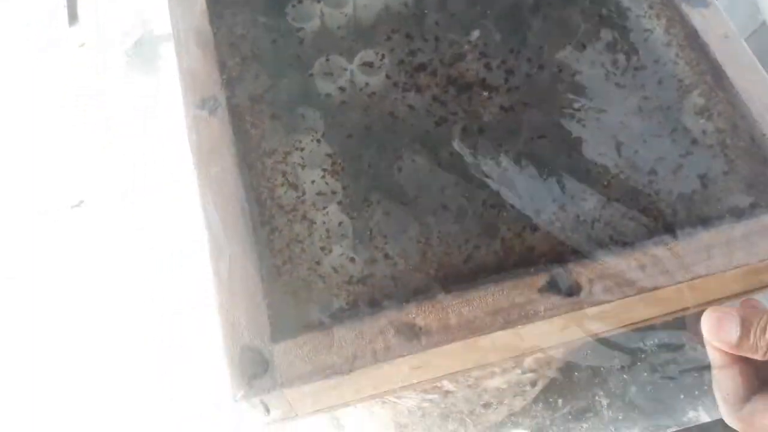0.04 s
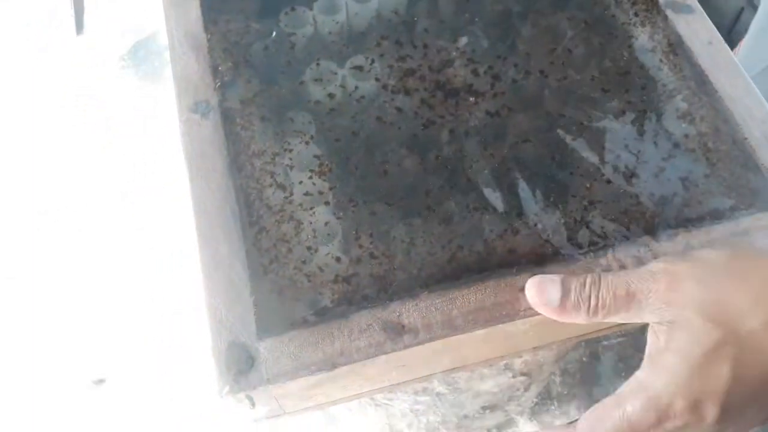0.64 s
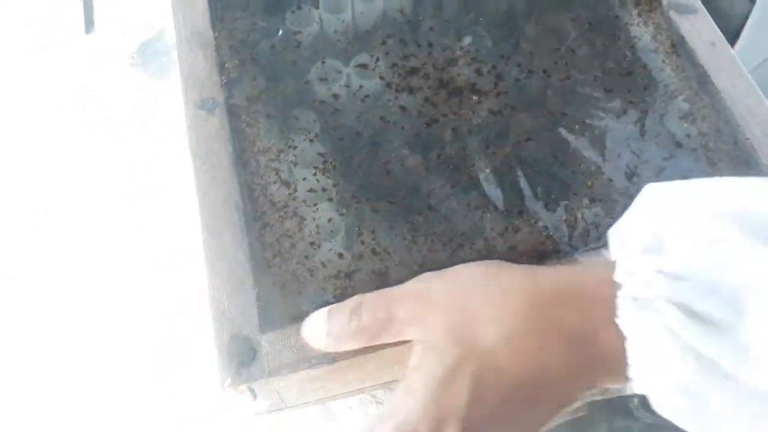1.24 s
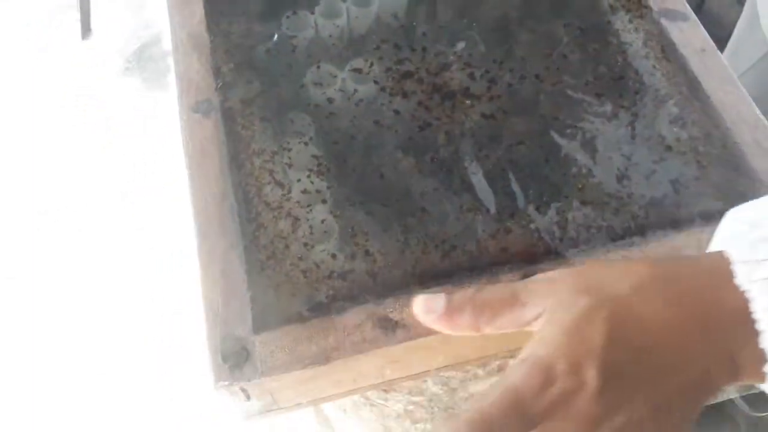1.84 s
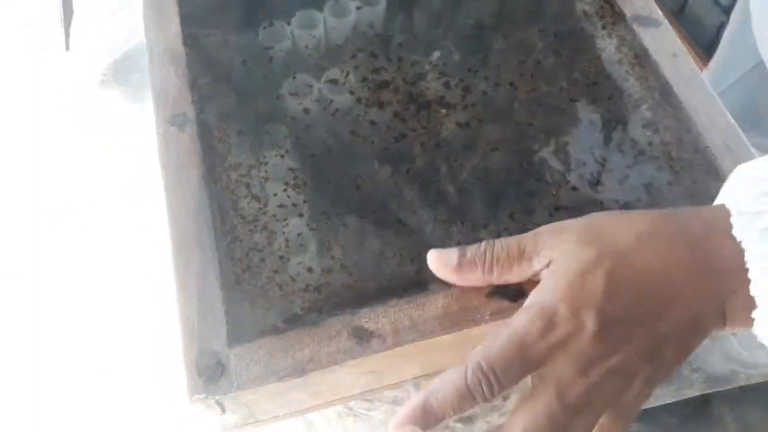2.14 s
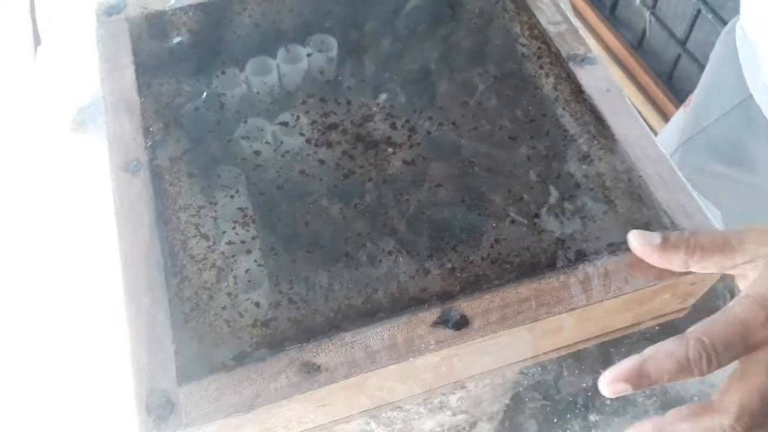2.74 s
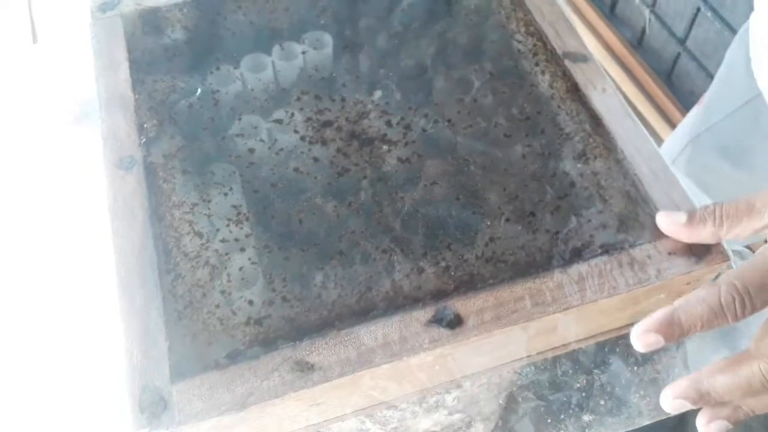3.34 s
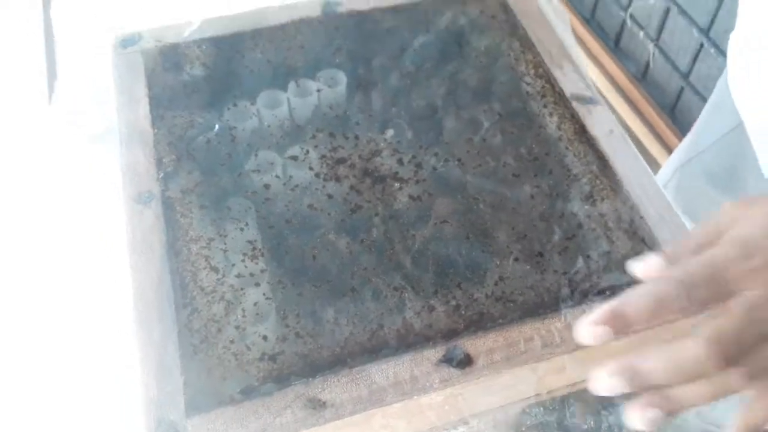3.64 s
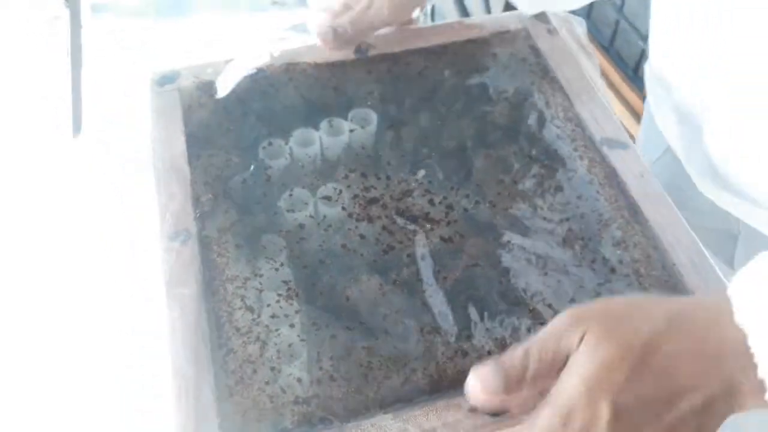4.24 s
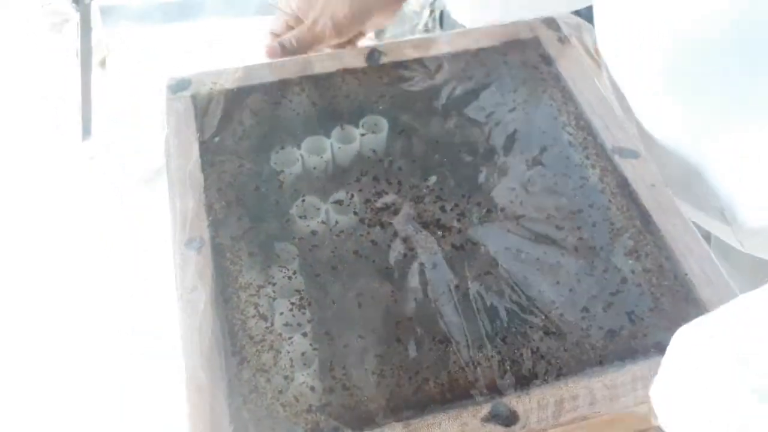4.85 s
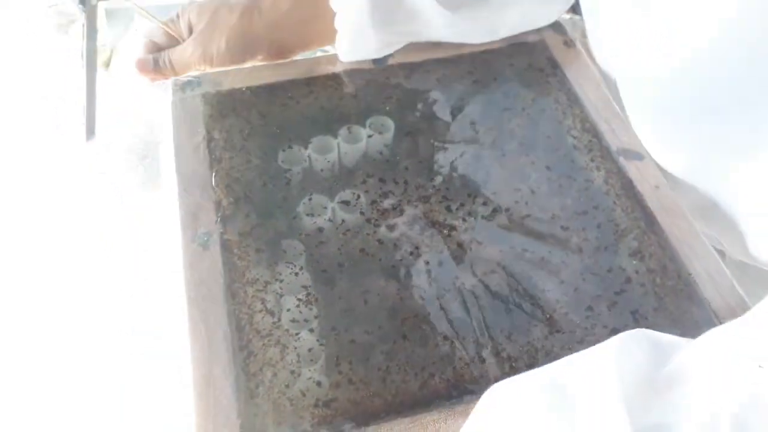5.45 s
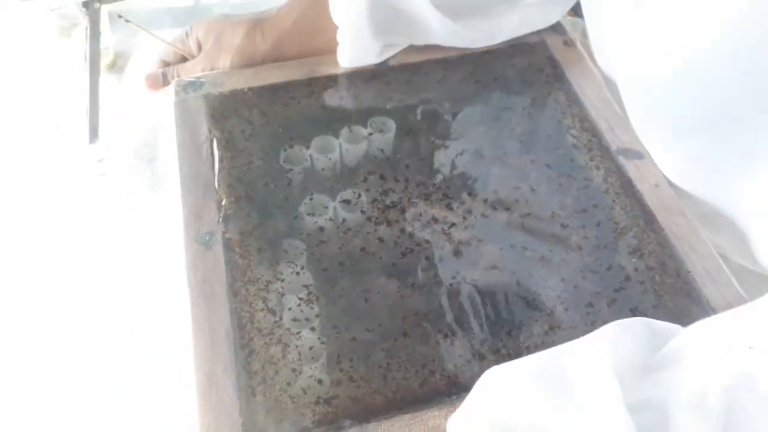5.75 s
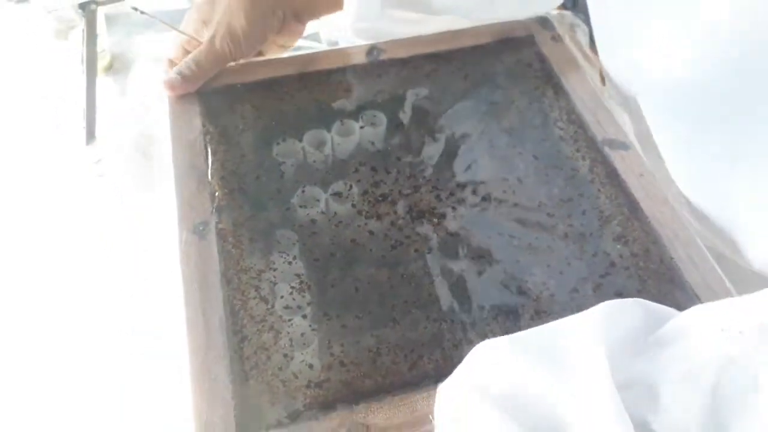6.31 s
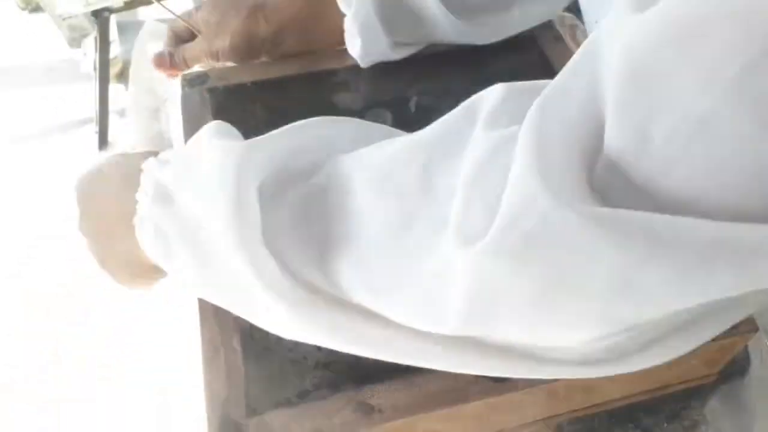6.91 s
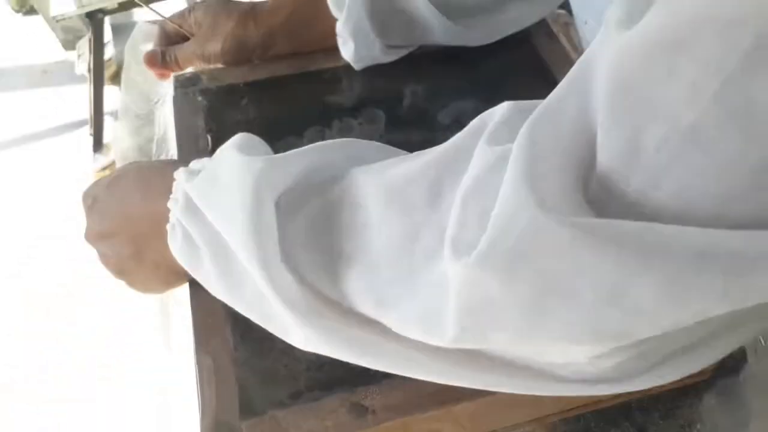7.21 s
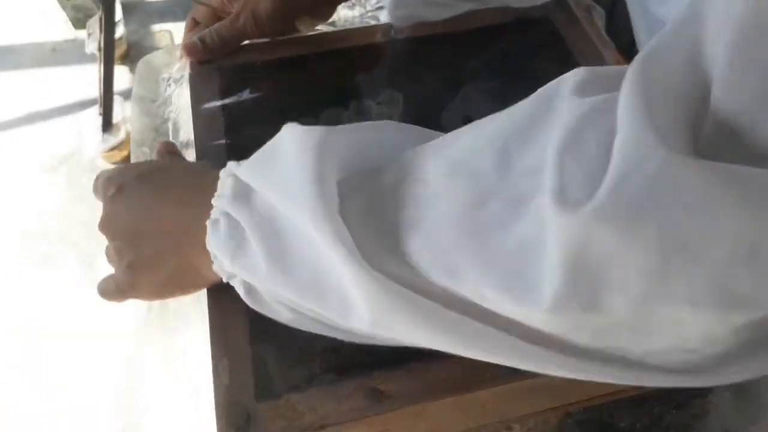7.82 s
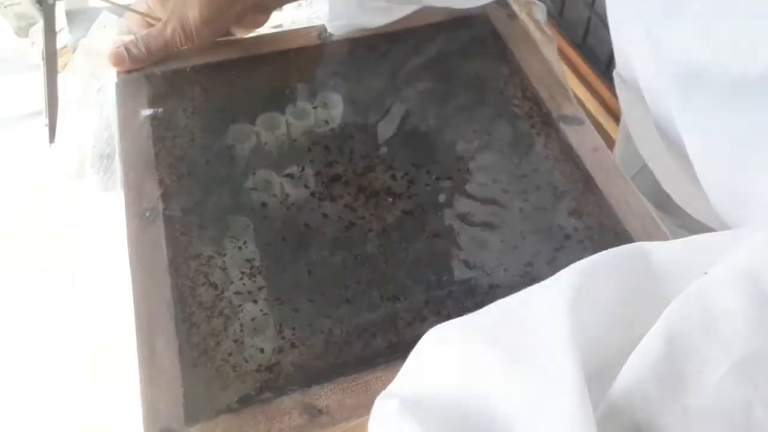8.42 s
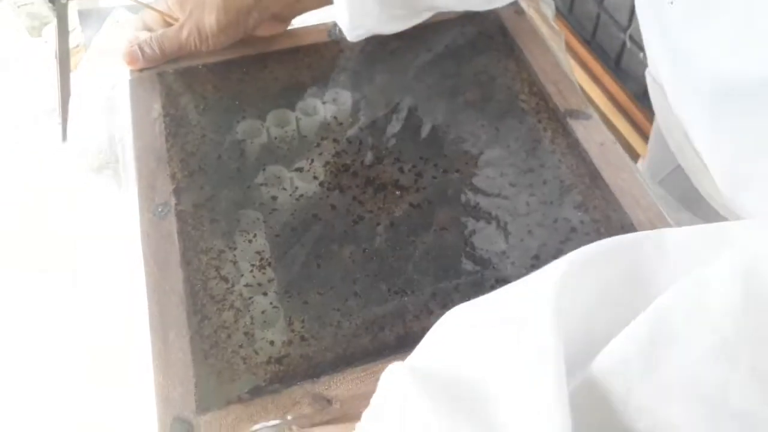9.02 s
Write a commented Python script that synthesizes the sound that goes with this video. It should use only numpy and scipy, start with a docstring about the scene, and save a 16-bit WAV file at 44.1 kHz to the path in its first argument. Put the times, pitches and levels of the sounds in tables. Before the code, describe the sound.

A clear plastic sheet crinkles and snaps in irregular bursts as hands smooth it over a wooden box outdoors, with distant traffic fading.

```python
"""Over far traffic, a crease snaps close by: hands are stretching and smoothing a clear plastic sheet
over a wooden hive box in a walled yard. Crease after crease flips, each followed by a close reflection
and a short tail off box and walls. Palms and sleeves swish over the film, the box rumbles where it is
worked hardest, and the taut sheet flaps softly. The traffic fades, leaving the still air of the yard."""
import sys
import numpy as np
from scipy import signal
from scipy.fft import rfft, irfft, next_fast_len
from scipy.io import wavfile
from scipy.ndimage import uniform_filter1d

SR = 44100
rng = np.random.default_rng(int(sys.argv[2]) if len(sys.argv) > 2 else 0)


def wav_out(sig):
    """Save sig, one row per channel (or a flat mono array), as 16-bit PCM at SR to the path in sys.argv[1]."""
    wavfile.write(sys.argv[1], SR, np.round(np.clip(np.atleast_2d(sig).T, -1, 1) * 32767).astype(np.int16))


N = 399987

# the loud creases: start_s, ring_db, ring_hz, thud_db, crack_db
CREASES = [(.0144, -20.5, 1610, -24, -22.5), (.4832, -40, 1390, -37, -37), (.956, -45, 1390, -26.5, -33.5),
           (1.446, -21, 1720, -35, -44), (2.145, -25.5, 442, -37, -33.5), (2.173, -38.5, 2430, -44, -58),
           (2.648, -35, 3500, -34.5, -36), (2.9613, -44, 7200, -64, -66), (3.0685, -49, 1490, -40.5, -44),
           (3.1449, -27.5, 575, -28, -40), (3.38, -35, 637, -46, -62), (3.475, -34, 5670, -43, -33.5),
           (3.491, -37, 1276, -39, -39.5), (3.870, -29.5, 1461, -24.5, -33.5),
           (3.946, -28.5, 3010, -22.5, -22.5), (4.3811, -18.5, 2120, -18, -15.5),
           (4.4296, -22, 614, -28.5, -28), (4.4458, -12.5, 2098, -16, -15), (4.471, -21, 2000, -19, -37),
           (4.5236, -5, 6800, -18, -8), (4.5387, -19, 961, -18, -18), (4.6012, -24.5, 1148, -24, -18),
           (4.6418, -12, 470.8, -30, -27.5), (4.874, -35, 780, -27, -38.5), (4.9748, -34.5, 2000, -26, -32),
           (5.082, -23, 2290, -24, -22.5), (5.096, -23, 1549, -40.5, -23.5), (5.132, -40, 3420, -39.5, -27),
           (5.172, -32.5, 1810, -28, -21), (5.193, -26, 1284, -31.5, -23), (5.209, -18.5, 1539, -17.5, -16),
           (5.231, -17.5, 5000, -28.5, -21.5), (5.264, -17, 2330, -28, -23.5),
           (5.294, -20.5, 2580, -38, -35), (5.3169, -19.5, 1260, -34, -43),
           (5.349, -24.5, 2240, -27, -40.5), (5.3802, -16.5, 1700, -47, -24), (5.3812, -18, 4440, -53, -27),
           (5.3997, -18.5, 2330, -40, -50), (5.4438, -27, 1710, -33, -54), (5.5364, -26, 1040, -36, -34),
           (5.6133, -40, 2360, -28.5, -14), (5.637, -28, 920, -24, -15.5), (5.6934, -30, 2180, -46, -27),
           (5.8184, -34, 1270, -32, -40), (5.8532, -31, 1050, -28, -47), (5.969, -30.5, 1490, -38.5, -52),
           (6.0288, -22, 1700, -24, -17.5), (6.0913, -32, 1686, -22.5, -25), (6.1725, -22.5, 780, -28, -19),
           (6.406, -32, 1730, -28.5, -38), (6.4426, -22, 2920, -42, -32), (6.698, -23.5, 1690, -32, -20.5),
           (6.7553, -12, 2650, -32.5, -21.5), (6.8577, -22, 5070, -33, -23),
           (6.9892, -36.5, 1700, -32, -41), (7.0576, -35, 3400, -39, -35.5), (7.108, -41, 1900, -34, -60),
           (7.182, -33, 1800, -25.5, -49), (7.2669, -24, 1630, -26, -47), (7.295, -26.5, 421.7, -47, -41),
           (7.488, -38, 1226, -29.5, -43), (7.3797, -23.5, 5770, -30.5, -17.5),
           (7.5646, -7.5, 6815, -24, -9), (7.589, -21, 1720, -25, -42.5), (7.6068, -11, 6536, -28, -12),
           (7.918, -19.5, 6840, -34, -29), (7.9502, -24.5, 1730, -26.5, -24),
           (8.0084, -20, 5350, -23.5, -18), (8.2805, -21, 1750, -25, -24.5), (8.316, -24, 2764, -35, -26),
           (8.352, -24.5, 6515, -30, -15), (8.663, -31, 1278, -35, -65), (8.7467, -32, 2140, -29, -31.5),
           (8.7958, -19, 953, -21, -21), (8.8467, -35.5, 1078, -30.5, -22)]
# spectrum of friction on the film: frequency_hz, relative_db
FRICTION_SPECTRUM = [(400, 0.5), (1500, 6), (3000, 5), (6200, 5.5), (8000, 2.5), (13000, -3),
                     (16000, -14.5)]


def from_db(db):
    return 10 ** (np.asarray(db) / 20)


def rms_one(x):
    return x / np.sqrt(np.mean(x ** 2) + 1e-20)


def unit_energy(x):
    return x / np.sqrt(np.sum(x ** 2) + 1e-20)


def fade(t, t60):
    return np.exp(-np.log(1000) * t / t60)


def band(x, low_hz, high_hz, order=2):
    sos = signal.butter(order, [low_hz, min(high_hz, .45 * SR)], "band", fs=SR, output="sos")
    return signal.sosfilt(sos, x)


def add(out, start_s, sound):
    start = int(np.clip(round(start_s * SR), 0, N - 1))
    out[start:start + len(sound)] += sound[:N - start]


def colour(x, spectrum):
    """Causal (minimum-phase) filter through rows of frequency_hz, gain_db."""
    size = next_fast_len(N + SR // 10, True)
    points_hz, points_db = np.transpose(spectrum)
    gain_db = np.interp(np.log(np.fft.rfftfreq(size, 1 / SR) + 1), np.log(points_hz), points_db)
    cepstrum = irfft(np.log(from_db(gain_db)), size)
    cepstrum[1:size // 2] *= 2
    cepstrum[size // 2 + 1:] = 0
    return irfft(rfft(x, size) * np.exp(rfft(cepstrum)), size)[:N]


def noise(spectrum):
    return rms_one(colour(rng.standard_normal(N), spectrum))


def drift(per_s):
    """Random wander through per_s values a second; rms 1."""
    values = rng.standard_normal(N // 20)
    return rms_one(np.interp(np.arange(N) * per_s / SR, np.arange(len(values)), values))


def smooth_power(x, spread_s):
    """Power of a sound, spread over the moments before and after."""
    width = max(int(spread_s * SR), 1)
    return np.maximum(uniform_filter1d(uniform_filter1d(x ** 2, width), width), 1e-14)


def swells(gestures):
    """Summed power of bell-shaped gestures, each 6 dB down half its duration from the peak."""
    t, power = np.arange(N) / SR, np.zeros(N)
    for peak_s, duration_s, level_db in gestures:
        offset = 2 * np.clip(t - peak_s, -1, 1) / duration_s
        power += (from_db(level_db) * np.exp(-np.log(2) * offset ** 2) + 1e-9) ** 2
    return power


def traffic():
    """A far road, heard as a low wash that fades away."""
    road_levels = [(0, -43.5), (.6, -43), (1.2, -47.5), (1.8, -53), (3, -58), (9.07, -71)]  # the receding traffic: time_s, level_db
    road_spectrum = [(30, -23), (80, -7.5), (130, -5), (190, 9), (270, 1.5), (400, -6.5), (650, -10),
                     (1050, -1), (1500, -11.5), (3000, -16.5), (8000, -26)]  # its sound from the yard: frequency_hz, relative_db
    level_db = np.interp(np.arange(N) / SR, *np.transpose(road_levels))
    return from_db(level_db) * noise(road_spectrum)


def yard_air(level_db):
    """The faint, steady background of the yard."""
    air_spectrum = [(25, -34), (60, -0.5), (100, 8.5), (280, 14), (500, 3.5), (950, 10), (1800, -6),
                    (2450, 4.5), (2660, 10.5), (2900, -4), (4000, -11.5), (5900, -3), (6300, 3.5),
                    (6800, -11), (9400, -16), (10700, 5), (12200, -22), (16000, -17)]  # open-air ambience: frequency_hz, relative_db
    return from_db(level_db) * noise(air_spectrum)


def scatter(t, t60):
    """Envelope of a tail: lumpy early scatter off film, box and body, and the smooth echo of the walls."""
    lumps_db = 3.5 * np.repeat(rng.standard_normal(len(t) // 64 + 1), 64)[:len(t)] - 1.5
    early = 1.5 * from_db(lumps_db) * fade(t, .07)
    return (fade(t, t60) + early) * np.clip(t / .0032, 0, 1)


def burst(low_hz, high_hz, reflection_db, lag_s, jolt_t60, tail_db, tail_t60):
    """A brief jolt in one band reaches the microphone, then its close reflection and a diffuse tail."""
    t = np.arange(SR // 4) / SR
    envelopes = [fade(t, jolt_t60), fade(t, jolt_t60), scatter(t, tail_t60)]
    noises = band(rng.standard_normal((3, len(t))) * envelopes, low_hz, high_hz)
    direct, blur, tail = map(unit_energy, noises)
    tail = signal.lfilter(*signal.butter(1, 10530, fs=SR), tail)  # the yard's echo is duller
    reflection = from_db(reflection_db) * np.roll(unit_energy(direct + 1.05 * blur), round(lag_s * SR))
    close = unit_energy(direct + reflection)
    return (close + from_db(tail_db) * tail) * np.sqrt(SR / 1000)  # close part: energy of 1 ms at rms 1


def snap(ring_db, ring_hz, thud_db, crack_db, reflection_db):
    """A crease flips: its facet rings, the stretched film thuds and the fold cracks."""
    lag_s = rng.normal(.0036, .00025)
    ring_t60 = 10 / (ring_hz + 1100)  # small, high facets settle sooner
    ring = burst(ring_hz / 1.45, ring_hz * 1.45, reflection_db, lag_s,
                 jolt_t60=ring_t60, tail_db=-2.5, tail_t60=.29)
    thud = burst(266, 877, reflection_db, lag_s, jolt_t60=.0047, tail_db=-4.5, tail_t60=.26)
    # small facets and hard flips crack brighter
    bright, sharp = (ring_hz / 2000) ** .15, from_db(.084 * (crack_db + 19))
    top_hz = max(8700 * bright * sharp, 4000)
    crack = burst(1450 * bright, top_hz, reflection_db, lag_s, jolt_t60=.0045, tail_db=1, tail_t60=.29)
    flip = from_db(ring_db) * ring + from_db(thud_db) * thud + from_db(crack_db) * crack
    # the jolt rebounds from neighbouring folds, which gives each snap a colour of its own
    delays_s = rng.uniform(.00018, .0009, 2)
    rebounds = sum(rng.choice([-1, 1]) * np.roll(flip, round(s * SR)) for s in delays_s)
    return flip + .17 * rebounds


def snaps(reflection_db):
    """The loud creases flip in turn, each coming back off the box at about the same strength."""
    out = np.zeros(N)
    for start_s, *crease in CREASES:
        add(out, start_s, snap(*crease, rng.normal(reflection_db, 2)))
    return out


def ticks(per_s):
    """Tiny random clicks of the film's surface; rms 1."""
    clicks = rng.standard_normal(N) * (rng.random(N) < per_s / SR)
    return rms_one(colour(clicks, FRICTION_SPECTRUM))


def crinkles(creases):
    """The folds around a snapping crease crackle as the strain builds and lets go."""
    strain = np.sqrt(smooth_power(band(creases, 1600, 6400), spread_s=.033))
    return from_db(-14.5) * strain * ticks(per_s=140)


def film_and_box(creases):
    """The film colours every snap, which then drives the resonances of the sheet and the box under it."""
    film_spectrum = [(35, -38), (100, -20), (160, -2.5), (300, -3.5), (400, -5), (600, -4.5), (750, 0),
                     (1100, 0), (2250, -0.17), (4000, -3), (6000, 1.5), (7700, -4.5), (10000, -5),
                     (16000, -4)]  # the film's response: frequency_hz, gain_db
    resonances = [(294, -41, 0.33), (291.7, -0.5, 0.57), (354, 12.5, 0.11), (473.3, 8.5, 0.17),
                  (547, 14.5, 0.056), (727, 8, 0.14), (789, 3, 0.12), (993, 8, 0.15), (1113, -2.5, 0.12),
                  (1675, 4, 0.23), (2118, -31, 0.18), (2310, 8, 0.24), (4070, 22, 0.029), (5690, 15, 0.013),
                  (6300, -5, 0.012), (6200, 5, 0.012), (7100, 17, 0.026)]  # modes of film and box: pitch_hz, relative_db, t60_s
    film = colour(creases, film_spectrum)
    t = np.arange(SR // 2) / SR
    modes = sum(from_db(db) * np.sin(2 * np.pi * hz * t) * fade(t, t60) for hz, db, t60 in resonances)
    return film + from_db(-14.5) * signal.fftconvolve(film, unit_energy(modes))[:N]


def aftersnaps(count, reflection_db):
    """Some flips, mostly loud ones, shift the strain to a nearby crease that soon gives way more softly."""
    out = np.zeros(N)
    odds = np.cumsum([from_db(.6 * max(ring_db, crack_db)) for _, ring_db, _, _, crack_db in CREASES])
    for trigger in np.searchsorted(odds / odds[-1], (np.arange(count) + rng.random(count)) / count):
        start_s, ring_db, ring_hz, thud_db, crack_db = CREASES[trigger]
        loss_db = rng.normal(13.5, 2)
        pitch_hz = min(ring_hz * 2 ** rng.normal(0, .5), SR / 6)
        delay_s = rng.uniform(.01, .05)
        softer = snap(ring_db - loss_db, pitch_hz, thud_db - loss_db, crack_db - loss_db, reflection_db)
        add(out, start_s + delay_s, softer)
    return out


def strokes():
    """Skin and cloth catch and slip on the film: a grainy hiss with tiny ticks, swelling with speed."""
    sweeps = [(.19, .097, -37), (.42, 0.054, -46), (.98, 0.093, -44), (1.356, 0.21, -46), (1.92, 0.17, -50),
              (2.42, .27, -52.5), (2.72, 0.22, -57), (3.451, .17, -52), (4.191, .3, -48.5),
              (4.528, .1, -35), (4.842, .068, -41.5), (5.13, .36, -45), (5.929, .15, -45),
              (6.409, .09, -47), (6.818, .16, -42), (7.35, 0.046, -43), (7.504, .17, -47),
              (7.939, .26, -40), (8.285, .15, -45.5), (9.039, .073, -39)]  # passes of palm and sleeve: peak_s, duration_s, level_db
    resting_db = -60 + .5 * drift(per_s=5)  # the hands never lie quite still
    power = swells(sweeps) + from_db(resting_db) ** 2
    hiss = from_db(1.7 * drift(per_s=240)) * noise(FRICTION_SPECTRUM)
    return np.sqrt(power) * (hiss + from_db(-8) * ticks(per_s=220))


def box_rumble(creases, rub):
    """The hands' weight rumbles through the box, following the work on the film and swelling on a lean."""
    leans = [(.2, 0.36, -48.5), (2.16, 0.054, -45), (3.9, 0.084, -44), (4.54, 0.1, -37),
             (5.27, 0.27, -41.5), (6.85, 0.29, -45), (7.98, .08, -48), (8.32, 0.15, -46)]  # hands leaning on the box: peak_s, duration_s, level_db
    rumble_spectrum = [(30, -38), (55, -25), (100, -2.5), (140, -7.5), (200, -9.5), (300, -1.5),
                       (400, -5.5), (700, -15.5), (1500, -12), (4000, -33)]  # the box under load: frequency_hz, relative_db
    work = smooth_power(band(creases, 200, 1100) + from_db(1.5) * rub, spread_s=.093)
    work_db = 10 * np.log10(work / work.mean())
    power = from_db(-55.5 + .46 * work_db) ** 2 + swells(leans)
    return np.sqrt(power) * from_db(1.04 * drift(per_s=25)) * noise(rumble_spectrum)


def flaps(pitch_hz, rise_s, t60):
    """A soft push sets the film and the air under it booming briefly, like a slack drum."""
    pushes = [(0.588, -43.5), (1.13, -43.5), (2.217, -46), (2.729, -46), (4.32, -38.5), (4.96, -44),
              (5.07, -43), (5.687, -44), (5.808, -47.5), (6.082, -45.5), (7.674, -47), (7.975, -40),
              (8.058, -46), (8.31, -41.5), (8.82, -44.5)]  # pushes on the taut film: start_s, level_db
    out, t = np.zeros(N), np.arange(SR // 3) / SR
    for start_s, level_db in pushes:
        push = band(rng.standard_normal(len(t)), pitch_hz / 1.15, pitch_hz * 1.15, order=1)
        boom = unit_energy(push * np.minimum(t / rise_s, 1) * fade(t, t60))
        add(out, start_s, from_db(level_db) * boom * np.sqrt(SR * .067))  # energy of 67 ms at that level
    return out


def scene():
    """One microphone close to the box: snaps in front; rubbing, rumble, traffic and air under them."""
    creases, rub = snaps(reflection_db=-2), strokes()
    film = film_and_box(creases + aftersnaps(count=22, reflection_db=-2) + crinkles(creases))
    booms = flaps(pitch_hz=280, rise_s=.013, t60=.37)
    return (film + booms + rub + box_rumble(creases, rub) + traffic() + yard_air(level_db=-53.5))[None]


def record(dry):
    """The highest peaks are rounded and the top is cut."""
    ceiling, cutoff_hz = .75, 16100
    rounded = dry / (1 + (dry / ceiling) ** 4) ** .25
    return signal.sosfilt(signal.ellip(10, .1, 80, cutoff_hz, fs=SR, output="sos"), rounded)


dry = scene()
out = record(dry)
wav_out(out)
```